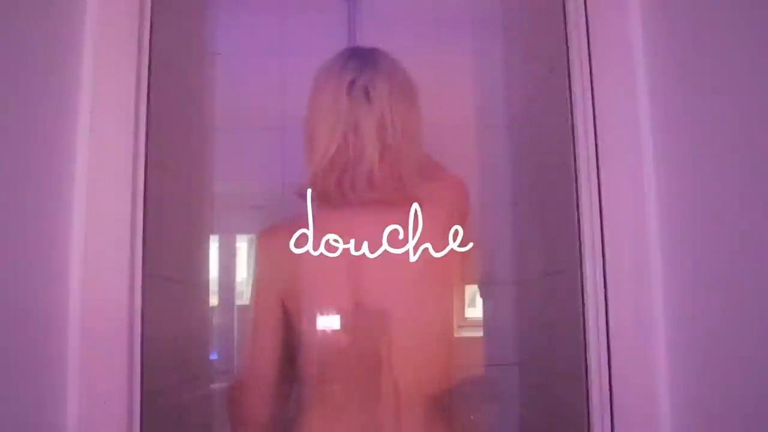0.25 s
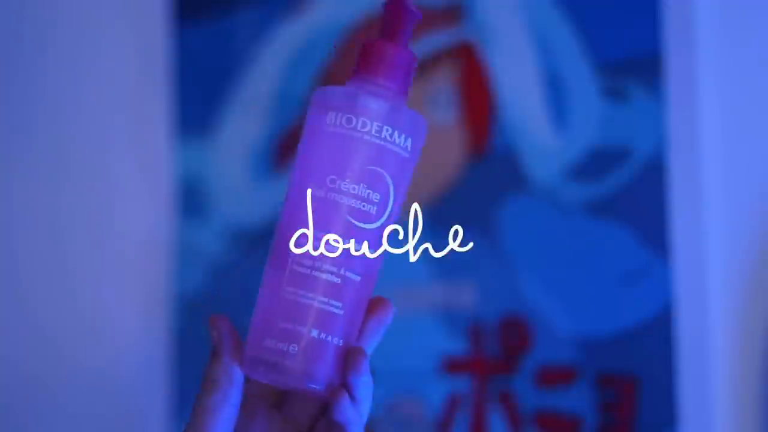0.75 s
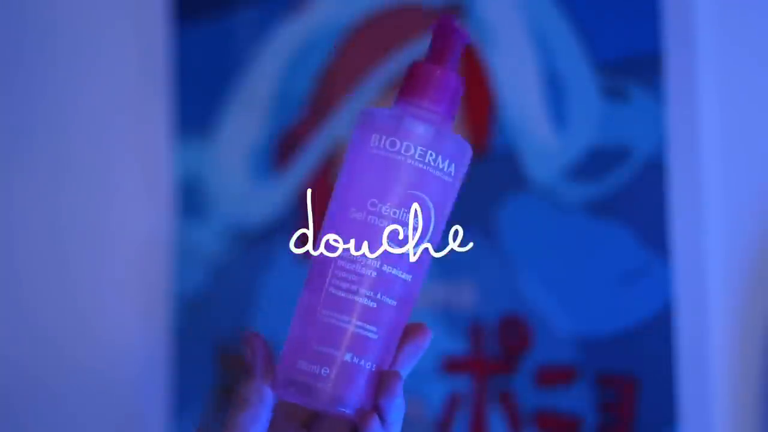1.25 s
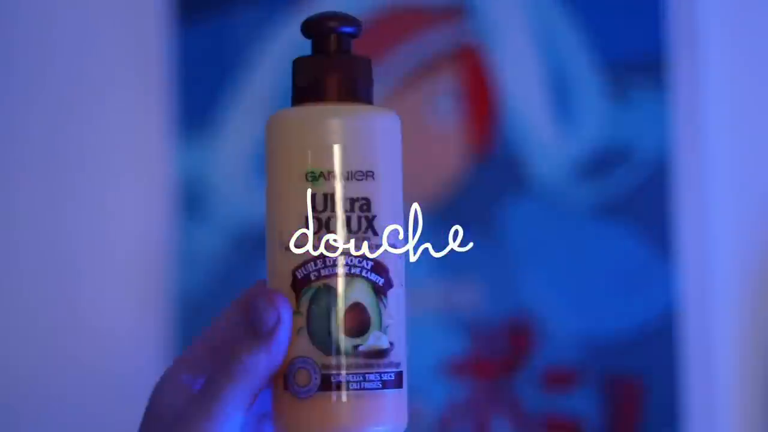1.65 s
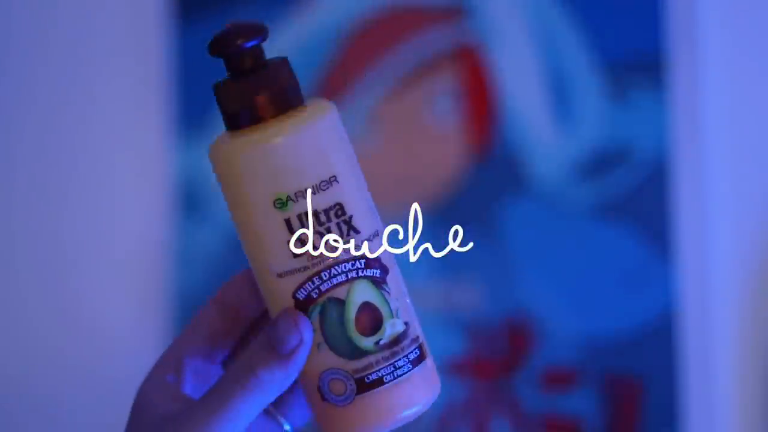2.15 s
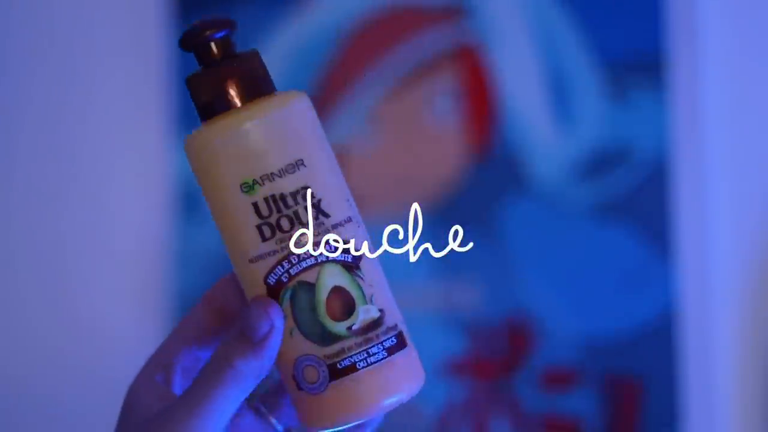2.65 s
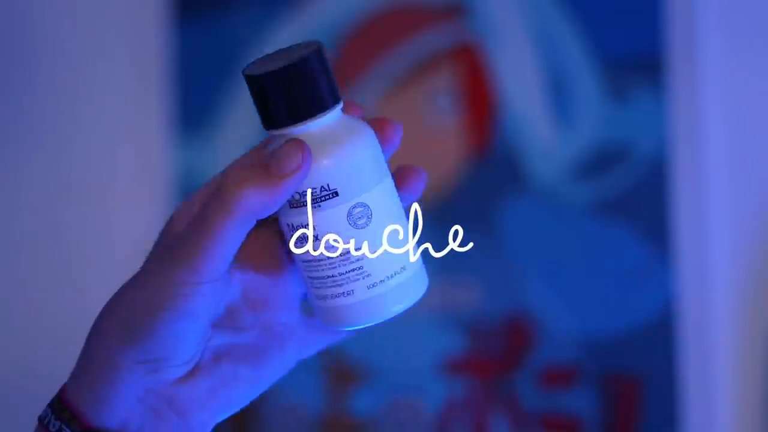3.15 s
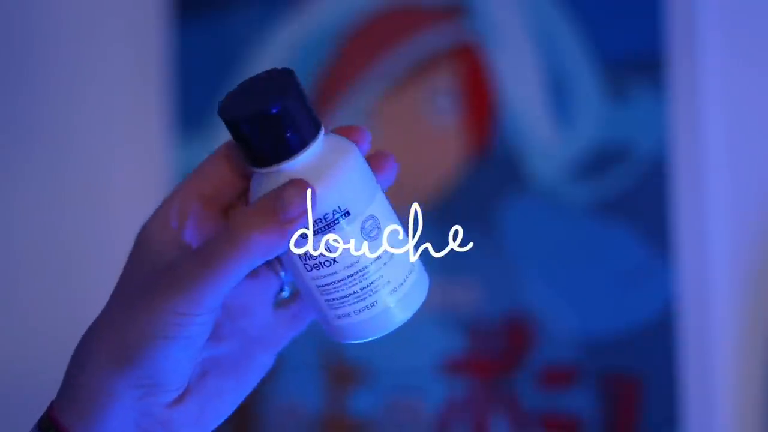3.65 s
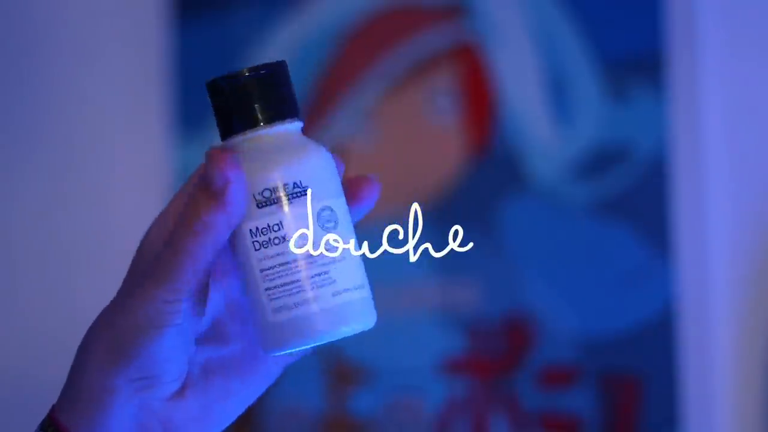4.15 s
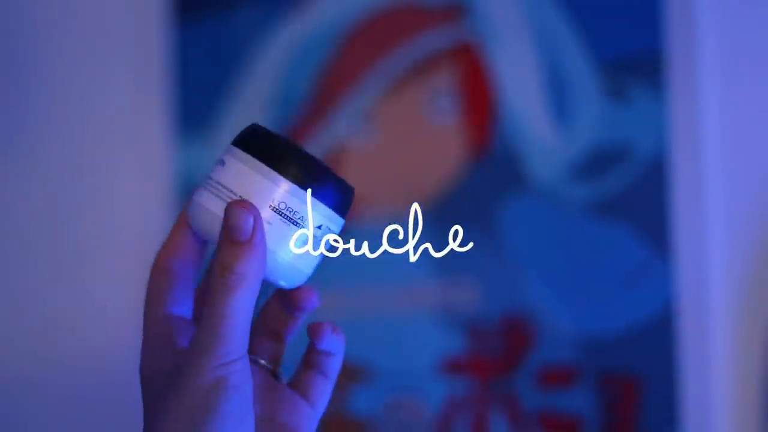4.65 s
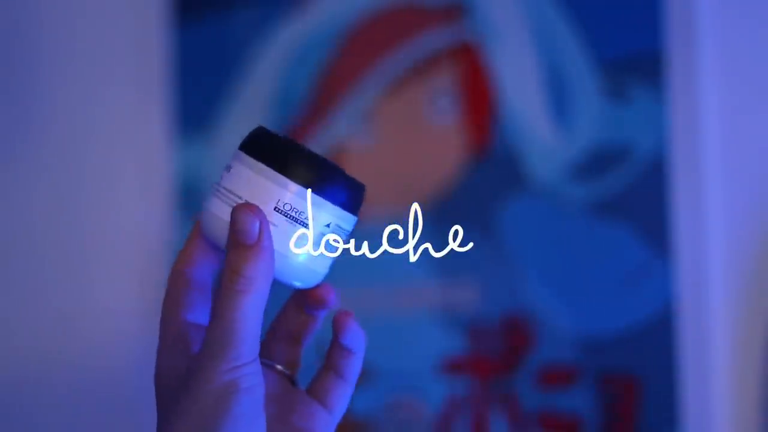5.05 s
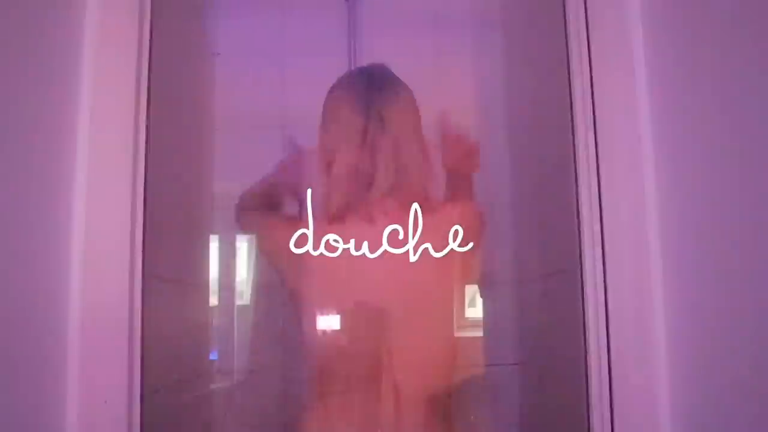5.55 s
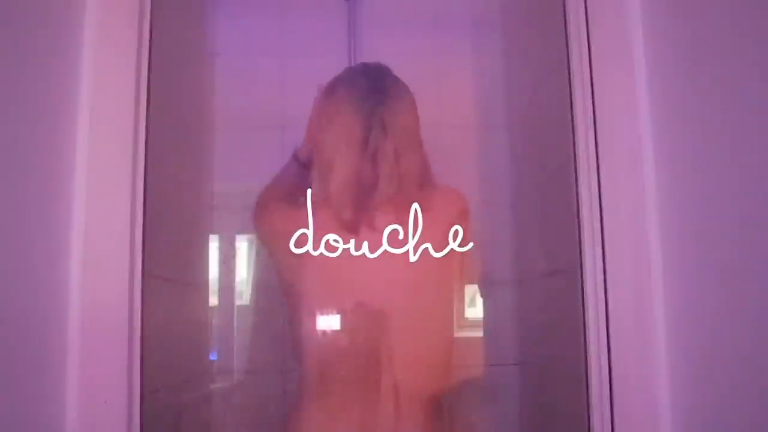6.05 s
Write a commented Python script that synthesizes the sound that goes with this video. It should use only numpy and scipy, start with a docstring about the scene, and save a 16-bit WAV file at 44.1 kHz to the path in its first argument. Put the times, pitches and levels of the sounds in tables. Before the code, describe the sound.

Close shower water hisses and patters onto a tray, broken by irregular slaps and splashes running off someone standing under it.

```python
"""Standing under a shower

A shower runs in a small tiled stall. Fine spray hisses, and heavier drops patter and drum on the tray.
Water gathers on a person's body and falls off in uneven splashes, and bubbles ring on the wet floor.
The tiles ring briefly; a close stereo microphone hears the bass in the middle and the treble very wide."""
import sys
import numpy as np
from scipy import signal
from scipy.fft import rfft, irfft, next_fast_len
from scipy.io import wavfile
from scipy.ndimage import uniform_filter1d

SR = 44100
rng = np.random.default_rng(int(sys.argv[2]) if len(sys.argv) > 2 else 0)


def put_to_file(sound):
    """Save the sound as 16-bit audio at rate SR, in the file named by the first command-line argument."""
    columns = np.atleast_2d(sound).T  # one column per channel
    safe = np.clip(columns, -1, 1)
    whole_steps = np.round(safe * 32767)
    wavfile.write(sys.argv[1], SR, whole_steps.astype(np.int16))


N = 277389

# spray that reaches the floor as the body moves in it: time_s, heavy_drops_db, fine_drops_db
SPRAY_FLOW = [(0, -37, -27.5), (.06, -41, -31), (.1, -35.5, -14), (.33, -34.5, -24.5), (.56, -29.5, -20),
              (.76, -32, -22.5), (.86, -32.5, -22), (.95, -33, -22), (1.45, -32, -23), (1.8, -32, -25.5),
              (2.06, -32, -21.5), (2.2, -31.5, -19), (2.38, -34, -21.5), (2.8, -29, -20.5),
              (2.93, -33.5, -28), (3.2, -29.5, -16.5), (3.35, -26.5, -20), (3.59, -34, -26.5),
              (3.92, -31.5, -20), (4.26, -35, -26), (4.65, -34, -20), (4.82, -35, -23),
              (4.92, -31.5, -21.5), (5.28, -34, -22), (5.4, -35.5, -21), (5.6, -33.5, -22),
              (5.95, -34.5, -21.5), (6.29, -35.5, -24)]
# tone of the heavy drops: frequency_hz, level_db
PATTER_TONE = [(400, -30), (720, -11), (980, -5), (1350, -5.5), (1850, -3), (2300, -1.5), (2850, 1),
               (3700, 1), (4500, -.5), (5600, -8), (9200, -26)]
# tone of the fine drops: frequency_hz, level_db
HISS_TONE = [(1900, -30.5), (3600, -34), (5200, -2.5), (6500, 0), (8100, 0), (10300, 4.5), (11500, 4.5),
             (15000, 0.5)]
# lumps of water that slap the floor and walls: start_s, level_db, pitch_hz, spread_octaves, rise_s
WATER_SLAPS = [(.075, -14, 11900, .21, .0018), (.095, -20, 11100, .22, .003),
               (.149, -14.5, 6350, 0.49, 0.0023), (.234, -18, 9600, .37, 0.0027),
               (.736, -21, 6760, 0.22, 0.0016), (1.147, -16.5, 6100, 0.71, 0.0033),
               (1.19, -21.5, 5600, 0.4, 0.0037), (1.246, -17, 7800, 0.53, 0.0032),
               (1.31, -22.5, 5900, 0.57, 0.0071), (1.389, -15, 6750, 0.71, 0.0036),
               (1.504, -24, 2600, 0.42, 0.0038), (1.5125, -10, 3600, 0.19, 0.0015),
               (1.515, -20, 2500, 0.25, 0.0026), (1.711, -26, 5500, 0.32, 0.0025),
               (1.718, -15.5, 5050, 0.41, 0.0027), (1.96, -27, 5130, 0.22, 0.0033),
               (2.0715, -16.5, 3520, 0.29, 0.0027), (2.131, -21, 9500, .35, .003),
               (2.154, -25, 7000, 0.77, 0.0088), (2.182, -15, 8400, 0.68, 0.0043),
               (2.26, -26, 10000, .25, .002), (2.357, -23, 11200, 0.32, 0.0034),
               (2.525, -18.5, 6300, 0.91, .004), (2.63, -19, 9500, 0.72, 0.0028),
               (2.699, -26, 7500, 0.29, .003), (2.744, -25, 6500, 0.56, 0.0022),
               (2.833, -18.5, 4300, .5, 0.0023), (2.849, -17.5, 5500, 0.64, 0.0029),
               (2.957, -19.5, 6140, 0.32, 0.0022), (2.966, -19, 8000, 0.68, 0.0051),
               (3.11, -15, 6740, 0.42, 0.0036), (3.139, -18.5, 7800, 0.74, 0.0071),
               (3.215, -21.5, 4020, .17, 0.0027), (3.232, -9.5, 8500, 0.54, .0022),
               (3.29, -27, 3420, 0.41, 0.0076), (3.338, -20, 5150, 0.61, 0.0034),
               (3.428, -21.5, 4930, .22, .004), (3.494, -22, 4470, .42, 0.0031),
               (3.815, -20, 7500, .45, 0.0027), (3.8308, -10, 5170, 0.72, 0.0017),
               (3.853, -20, 7500, .5, .003), (4.426, -17.5, 8200, .55, 0.0033),
               (4.577, -24, 4900, 0.22, .003), (4.676, -26, 8150, 0.42, 0.0026),
               (4.738, -18, 8100, 0.45, 0.0023), (5.085, -22, 5940, 0.37, .003),
               (5.167, -26, 9300, 0.19, 0.0018), (5.343, -22.5, 9100, 0.25, 0.0023),
               (5.368, -26.5, 8450, 0.18, .004), (5.432, -24, 9500, 0.21, .002),
               (5.675, -36, 6200, .15, 0.0018), (5.71, -34, 1800, 0.31, 0.0022),
               (5.8765, -15.5, 4120, 0.52, 0.0014), (5.892, -29, 2900, 0.17, 0.0036),
               (6.018, -23, 6800, 0.6, .003), (6.147, -28, 7000, .5, 0.0022)]
# cushions of air caught under falling water: start_s, level_db, pitch_hz
AIR_CUSHIONS = [(1.149, -27, 3480), (1.513, -24.5, 6230), (1.971, -27.5, 3050), (2.072, -23, 4700),
                (2.757, -35, 1980), (2.834, -23, 4000), (3.43, -34, 4330), (5.621, -35.5, 2470),
                (5.877, -24, 3400), (5.877, -27.5, 4630), (6.018, -30, 4430), (6.109, -33.5, 2700)]
# sheets of water that slide off the body onto the tray: start_s, swish_db, thump_db
WATER_SHEETS = [(.106, -28, -39.5), (1.334, -25, -45), (1.422, -21, -40), (2.182, -23, -40.5),
                (2.461, -20, -34), (2.52, -28, -37), (3.2, -21, -34.5), (3.334, -49, -37), (5.44, -29, -41)]
# large bubbles that burst with a low plop: start_s, level_db, pitch_hz
BIG_BUBBLES = [(1.435, -33.5, 423), (1.461, -41, 430), (2.508, -35, 452), (6.269, -27.5, 720)]
# weight of the water on the tray: time_s, drumming_db, boom_db
TRAY_WEIGHT = [(0, -45, -51.5), (.6, -41, -54.5), (1.15, -40, -46), (1.6, -41.5, -53), (1.95, -44, -45.5),
               (2.2, -40, -51.5), (3.2, -37, -45.5), (3.7, -38, -50), (4.65, -39.5, -50),
               (5.15, -37.5, -45), (5.7, -39.5, -44), (6.29, -39, -44.5)]
# notes at which the tray and stall ring: pitch_hz, width_hz, level_db
TRAY_NOTES = [(401, 19, -5.5), (423.6, 13, -2.5), (454, 16, -9.5), (503, 30, -7), (547, 18.7, -1.5),
              (679, 11, -5)]
# dull thud between those notes: frequency_hz, level_db
THUD_TONE = [(60, -18), (180, -15.5), (300, -22), (350, -14), (420, -9), (600, -10), (800, -8),
             (1000, -17.5), (1400, -50), (3000, -25)]
# the tray's lowest notes: pitch_hz, width_hz, level_db
LOW_NOTES = [(212.5, 9.2, 2), (242.6, 8.9, 4), (279.2, 15.3, 2)]
# how loudly those lowest notes ring: time_s, level_db
LOW_LOUDNESS = [(0, -49.5), (1.1, -45.5), (1.6, -47), (1.95, -50), (2.15, -43), (2.55, -43.5), (3.3, -43),
                (3.65, -46.5), (4.3, -46), (4.7, -47.5), (5.15, -43), (6.29, -49.5)]
# near silence between notes that ring alone: frequency_hz, level_db
SILENT_TONE = [(1000, -100)]
# deep boom of the stall: pitch_hz, width_hz, level_db
BOOM_NOTES = [(142.7, 10.6, 4), (163, 28, -9)]
# the room's deepest note, heard in the rumble: pitch_hz, width_hz, level_db
ROOM_NOTE = [(69, 17, -3.5)]
# steady rumble under the boom: frequency_hz, level_db
RUMBLE_TONE = [(10, -13), (27, -2), (42, -14), (85, -9), (115, -13), (190, -40), (400, -30.5)]
# how long the tiles' echo takes to fade by 60 dB: frequency_hz, fade_s
ECHO_FADE = [(300, .45), (2000, .32), (3500, .3), (8000, .3), (13000, .25)]
# how alike left and right are (1 the same, -1 opposite): frequency_hz, likeness
STEREO_LIKENESS = [(30, .995), (65, .98), (125, .93), (280, .88), (550, .75), (1000, .36), (1900, .22),
                   (2700, -.2), (4000, -.3), (4700, -.4), (8000, -.52), (11300, -.62), (12200, -.76),
                   (13000, -.985)]
# how the top treble fades away: frequency_hz, level_db
TOP_TREBLE_TONE = [(11500, 0), (12200, -3.5), (13000, -8.5), (14000, -14), (15200, -23)]


def spray():
    """Heavy drops patter and fine ones hiss, and the tiles echo both."""
    patter = falling_drops(PATTER_TONE, per_s=2800, spread_db=2.0, clump_db=1.6, clump_hz=60)
    hiss = falling_drops(HISS_TONE, per_s=6500, spread_db=1.9, clump_db=2.8, clump_hz=70)
    falling = patter * loudness(SPRAY_FLOW, column=1) + hiss * loudness(SPRAY_FLOW, column=2)
    return amp(-5.5) * (falling + tile_echo(falling, wet_db=2.5))


def falling_drops(tone, per_s, spread_db, clump_db, clump_hz):
    """A steady fall of drops; the jets break up, so the drops land in clumps."""
    clumps = amp(clump_db * flutter(N, clump_hz))
    hits = impacts(N, per_s, spread_db) * clumps
    return unit_level(filtered(hits, lambda hz: amp(look_up(tone, hz))))


def splashes():
    """Water falls off the body: each splash comes from one spot, its echo from all around."""
    near = amp(2.5) * (slaps() + gulps() + swishes() + drips() + bubbles())
    lean_to_middle = amp([[.9], [-.5]])
    return lean_to_middle * near + tile_echo(near, wet_db=-.2)


def slaps():
    """Lumps of water slap the wet surfaces: compact ones with a crack, loose ones with a splat."""
    return bursts(WATER_SLAPS, steepness=1.8)


def gulps(octaves=0.074, rise_s=0.0048):
    """A cushion of air under falling water rings roughly for a moment and makes it sound hollow."""
    return bursts([(s, db, hz, octaves, rise_s) for s, db, hz in AIR_CUSHIONS], steepness=1.7)


def swishes(pitch_hz=8600, octaves=1, rise_s=0.019):
    """A sheet of water lands slowly, with a broad bright swish."""
    return bursts([(s, db, pitch_hz, octaves, rise_s) for s, db, _ in WATER_SHEETS], steepness=1.95)


def drips(per_s=24, low_hz=4630, high_hz=12000, octaves=0.093, rise_s=0.0014):
    """Small drips land at uneven moments, louder while more spray runs off the body."""
    count = round(per_s * N / SR)
    when, pitch, strength = rng.random((count, 3)).T
    starts = (np.arange(count) + when) * N / SR / count
    pitches = low_hz * (high_hz / low_hz) ** pitch
    levels = -31 + 2 * (2 * strength - 1) + 4.5 * np.log2(pitches / low_hz)  # higher drips are louder
    rows = [(s, db, hz, octaves, rise_s) for s, db, hz in zip(starts, levels, pitches)]
    return bursts(rows, steepness=2.9) * unit_level(loudness(SPRAY_FLOW, column=2))


def bubbles(rise_s=0.0042, decay_s=0.017, climb_per_s=5.35):
    """Each bubble rings briefly on one note, which climbs as the bubble nears the surface."""
    out, t = np.zeros((2, N)), np.arange(SR // 10) / SR
    ring = (1 - np.exp(-t / rise_s)) * np.exp(-t / decay_s)
    for start_s, db, hz in BIG_BUBBLES + froth():
        wobble = 0.07 * flutter((2, len(t)), speed_hz=250)  # churning water shakes the pitch
        phase = 2 * np.pi * np.cumsum(hz * (1 + climb_per_s * t + wobble), axis=1) / SR
        add(out, start_s, amp(db) * ring * np.array([np.sin(phase[0]), np.cos(phase[1])]))
    return out


def froth(per_s=22, low_hz=2164, high_hz=8100):
    """Faint bubbles all over the wet floor, as random rows of start_s, level_db, pitch_hz."""
    when, strength, pitch = rng.random((round(per_s * N / SR), 3)).T
    return list(zip(when * N / SR, -37.5 + 4.5 * strength, low_hz * (high_hz / low_hz) ** pitch))


def tray():
    """Drops drum on the tray, sheets of water thump on it, and the stall booms over a steady rumble."""
    drumming = loudness(TRAY_WEIGHT, column=1) * drummed(TRAY_NOTES, THUD_TONE)
    low_ring = loudness(LOW_LOUDNESS, column=1) * drummed(LOW_NOTES, SILENT_TONE)
    thumping = thumps()
    boom = loudness(TRAY_WEIGHT, column=2) * drummed(BOOM_NOTES, SILENT_TONE)
    rumble = amp(-45.5) * drummed(ROOM_NOTE, RUMBLE_TONE)
    return amp(-1.53) * (drumming + low_ring + thumping + boom + rumble)


def thumps(pitch_hz=335, octaves=1, rise_s=0.022):
    """Each sheet of water lands on the tray with a low thump, shaped by the tray's notes."""
    rows = [(s, db, pitch_hz, octaves, rise_s) for s, _, db in WATER_SHEETS]
    return bursts(rows, steepness=7.9, surface=lambda hz: resonance(LOW_NOTES + TRAY_NOTES, THUD_TONE, hz))


def drummed(notes, tone):
    """A stream of drops keeps a set of notes ringing."""
    hits = impacts(N, per_s=2400, spread_db=0.6)
    return unit_level(filtered(hits, lambda hz: resonance(notes, tone, hz)))


def tile_echo(x, wet_db, patterns=4, cycles_per_s=9):
    """The tiles echo, treble dying first; the water keeps landing elsewhere, so the echo keeps changing."""
    shape = (patterns, 2, SR // 2)
    reflections = rng.choice([-1., 1.], shape) * (rng.random(shape) < .25)
    hz, t, spectrum = signal.stft(reflections, SR, nperseg=128)
    fade = amp(-60 * t / look_up(ECHO_FADE, hz)[:, None])
    tails = signal.istft(spectrum * fade, SR, nperseg=128)[1]
    tails[..., :round(.003 * SR)] = 0  # the nearest wall answers after 3 ms
    tails /= np.linalg.norm(tails, axis=-1, keepdims=True)
    turn = cycles_per_s * np.arange(N) / SR - np.arange(patterns)[:, None, None] / patterns
    shares = np.maximum(np.cos(2 * np.pi * turn), 0)  # each pattern blends into the next
    return amp(wet_db) * signal.fftconvolve(x * shares, tails, axes=-1)[..., :N].sum(0)


def bursts(rows, steepness, surface=np.ones_like):
    """Each lump of water breaks into droplets; its size and the air it traps give it a pitch."""
    out, t = np.zeros((2, N)), np.arange(SR // 6) / SR
    fade_out = np.minimum(2 * (1 - t / t[-1]), 1) ** 2
    for start_s, db, pitch_hz, octaves, rise_s in rows:
        def band(hz):
            distance = abs(np.log2((hz + 1) / pitch_hz) / (2 * octaves))
            return surface(hz) * np.exp(-distance ** steepness)
        droplets = unit_level(filtered(impacts(len(t), per_s=16000, spread_db=-1.8), band))
        swell = np.sqrt(t / rise_s * np.exp(1 - t / rise_s))  # peaks at rise_s, then dies away
        add(out, start_s, amp(db) * fade_out * smoothed(swell * droplets, band))
    return out


def impacts(size, per_s, spread_db):
    """Tiny clicks of random strength at random moments, in two channels: middle and side."""
    strength = amp(spread_db * np.minimum(rng.exponential(1, size), 5))
    landed = rng.random(size) < per_s / SR
    return unit_level(strength * landed * rng.standard_normal((2, size)))


def resonance(notes, tone, hz):
    """How strongly a surface answers at each frequency: a peak for each note on top of a smooth tone."""
    peaks = sum(amp(2 * db) / (1 + ((hz - pitch) / (.75 * width)) ** 2) ** 2 for pitch, width, db in notes)
    return np.sqrt(peaks + amp(2 * look_up(tone, hz)))


def smoothed(x, gain):
    """Irons chance peaks out of a short sound, so its tone follows gain; keeps its energy."""
    spectrum, hz = rfft(x), np.fft.rfftfreq(x.shape[-1], 1 / SR)
    wanted, found = (abs(uniform_filter1d(abs(v) ** 2, 60, axis=-1)) for v in (gain(hz), spectrum))
    return x.std() * unit_level(irfft(spectrum * np.sqrt(wanted / (found + 1e-9)), x.shape[-1]))


def flutter(shape, speed_hz):
    """A random wiggle, mostly slower than speed_hz."""
    return unit_level(filtered(rng.standard_normal(shape), lambda hz: 1 / (1 + (hz / speed_hz) ** 2)))


def filtered(x, gain):
    """Turns each frequency in x up or down by gain(hz)."""
    size = next_fast_len(x.shape[-1] + 512)
    return irfft(rfft(x, size) * gain(np.fft.rfftfreq(size, 1 / SR)), size)[..., :x.shape[-1]]


def look_up(table, hz):
    """A table's value at any frequency, blending between its rows."""
    frequencies, values = np.transpose(table)
    return np.interp(np.log(hz + 1), np.log(frequencies + 1), values)


def loudness(table, column):
    """Turns a column of decibels over time into a multiplier for every sample."""
    rows = np.asarray(table)
    return amp(np.interp(np.arange(N) / SR, rows[:, 0], rows[:, column]))


def amp(db):
    """Turns decibels into a multiplier."""
    return 10 ** (np.asarray(db) / 20)


def unit_level(x):
    """Scales a sound to an average (rms) level of 1."""
    return x / np.sqrt(np.mean(x ** 2) + 1e-20)


def add(mix, start_s, sound):
    """Adds a sound to the mix at start_s."""
    part = mix[:, max(round(start_s * SR), 0):][:, :sound.shape[1]]
    part += sound[:, :part.shape[1]]


def scene():
    """Mixes everything as middle (what left and right share) and side (how they differ), then to stereo."""
    middle, side = spray() + tray() + splashes()
    middle = filtered(middle, lambda hz: np.sqrt((1 + look_up(STEREO_LIKENESS, hz)) / 2))
    side = filtered(side, lambda hz: np.sqrt((1 - look_up(STEREO_LIKENESS, hz)) / 2))
    return np.array([middle + side, middle - side])


def record(dry, ceiling=.85, cutoff_hz=15400):
    """Dulls the top treble, softly squashes the sharpest slaps and cuts the very top."""
    dulled = filtered(dry, lambda hz: amp(look_up(TOP_TREBLE_TONE, hz)))
    squashed = dulled / (1 + abs(dulled / ceiling) ** 6) ** (1 / 6)
    low_pass = signal.firwin(511, cutoff_hz, window=("kaiser", 9), fs=SR)
    return signal.oaconvolve(squashed, low_pass[None], "same")


dry = scene()
out = record(dry)
put_to_file(out)
```